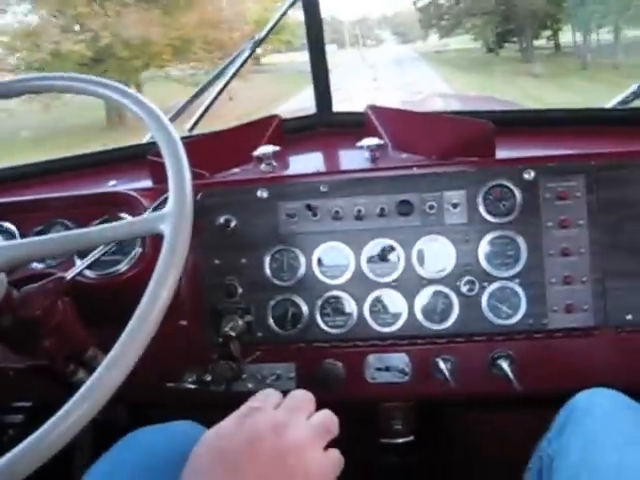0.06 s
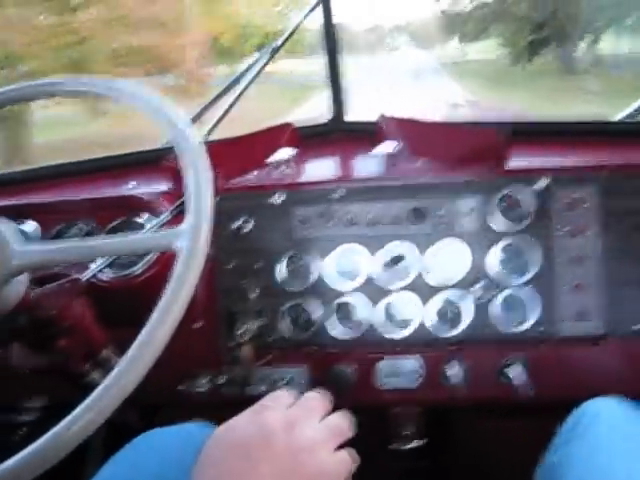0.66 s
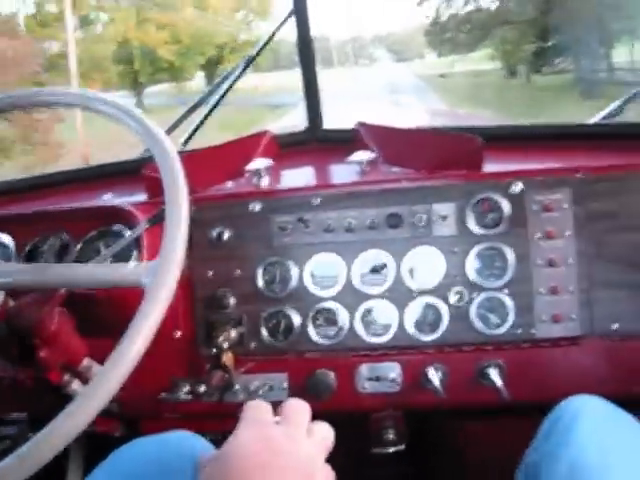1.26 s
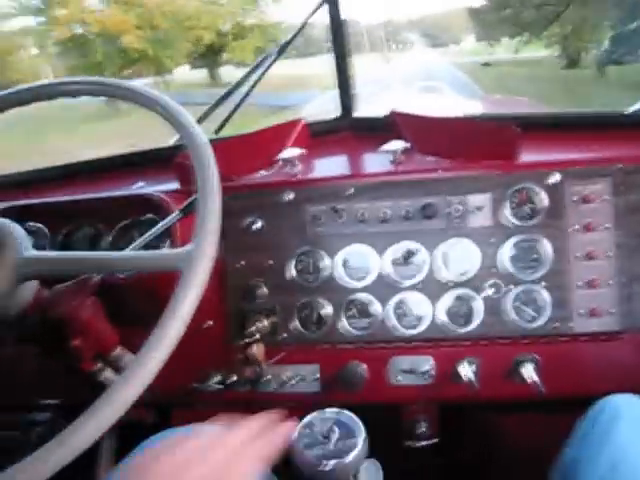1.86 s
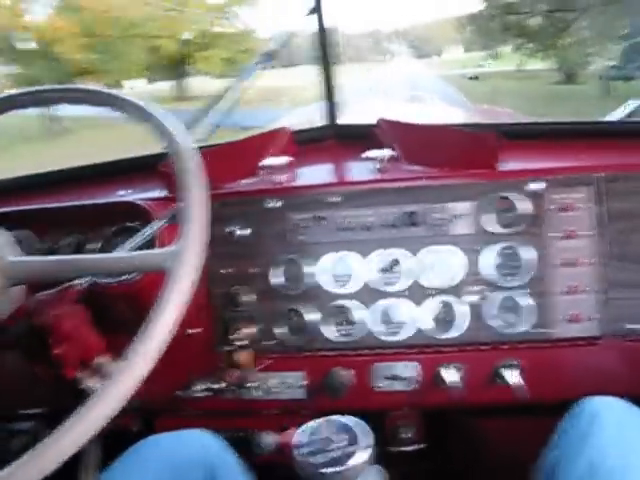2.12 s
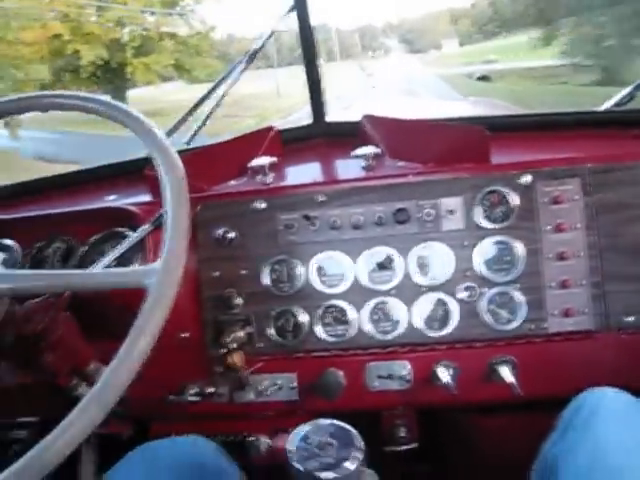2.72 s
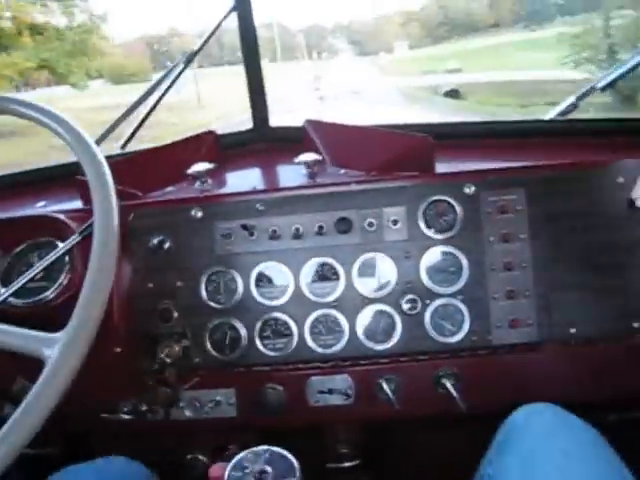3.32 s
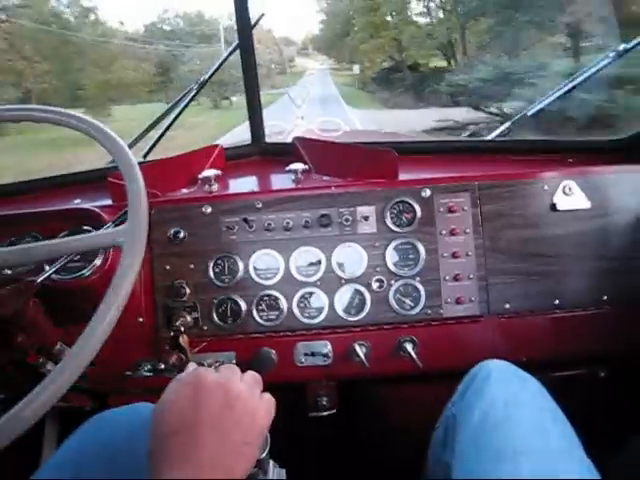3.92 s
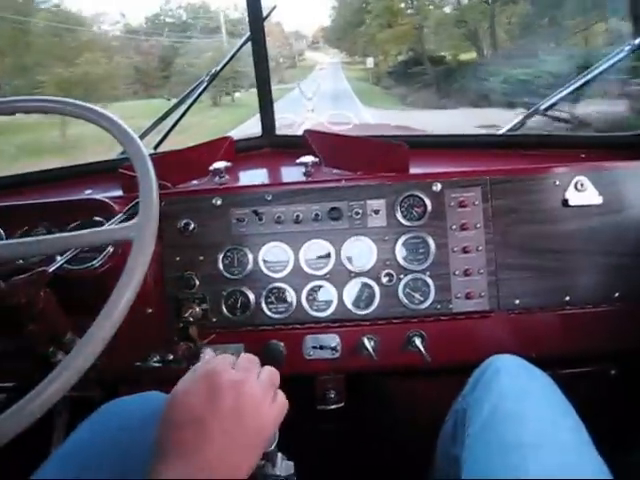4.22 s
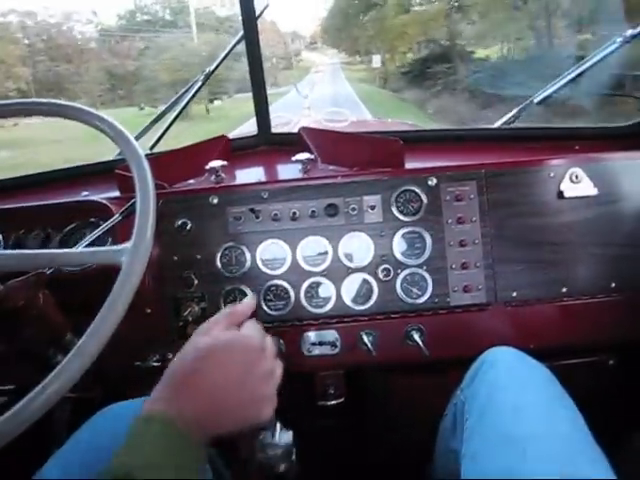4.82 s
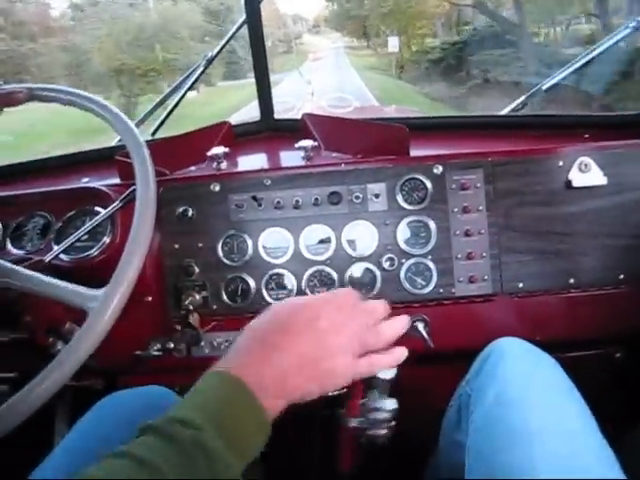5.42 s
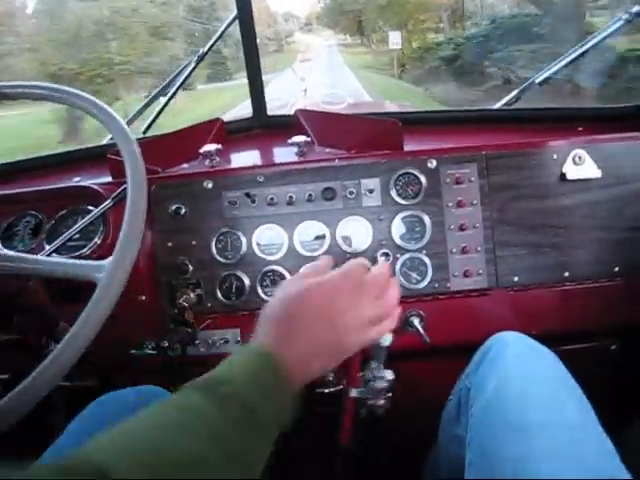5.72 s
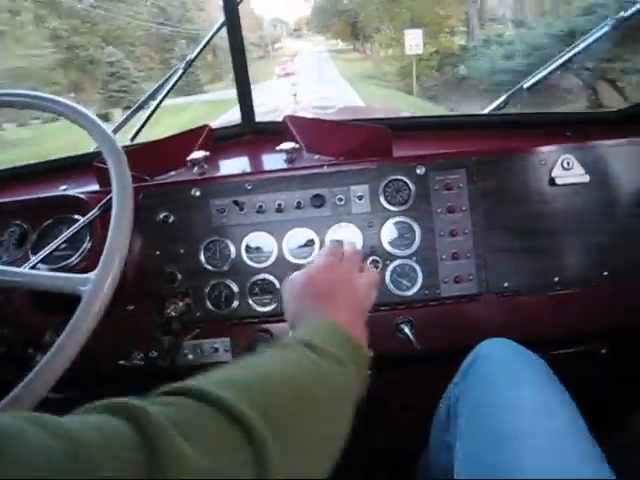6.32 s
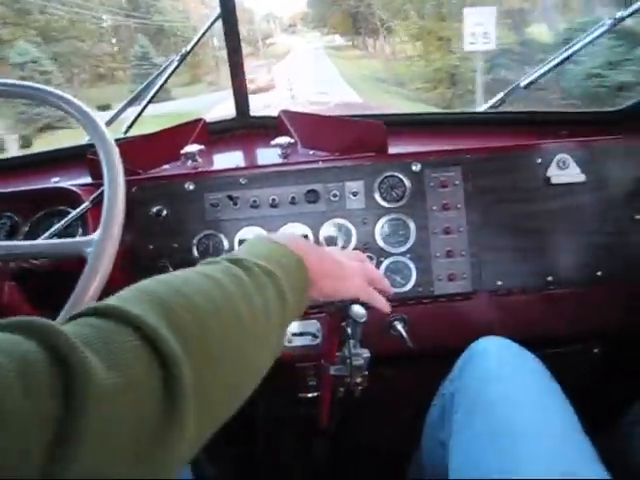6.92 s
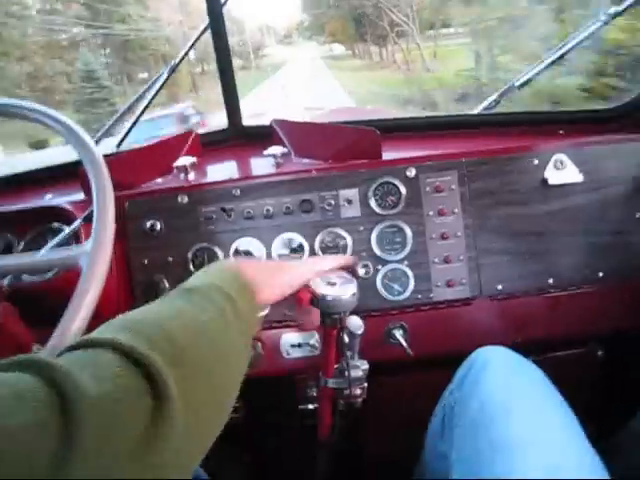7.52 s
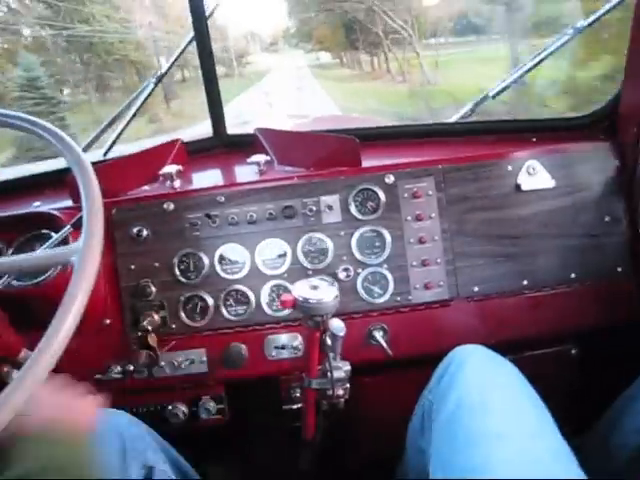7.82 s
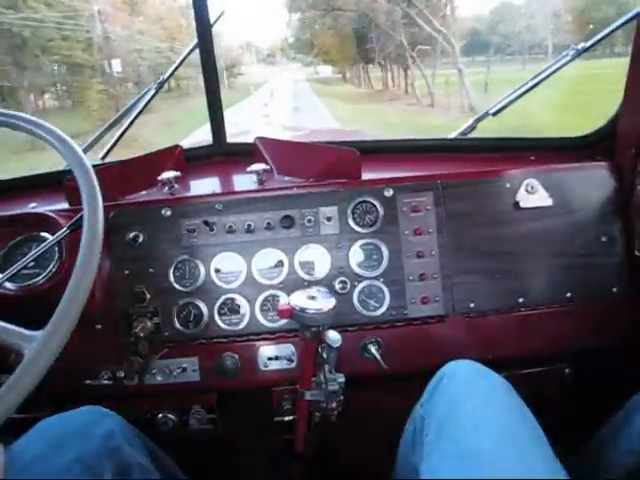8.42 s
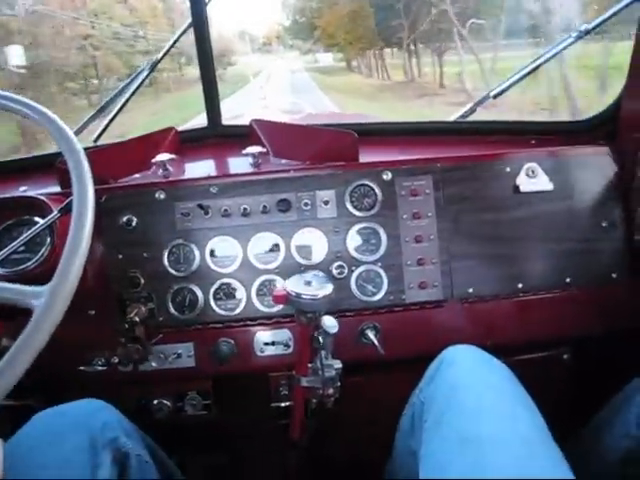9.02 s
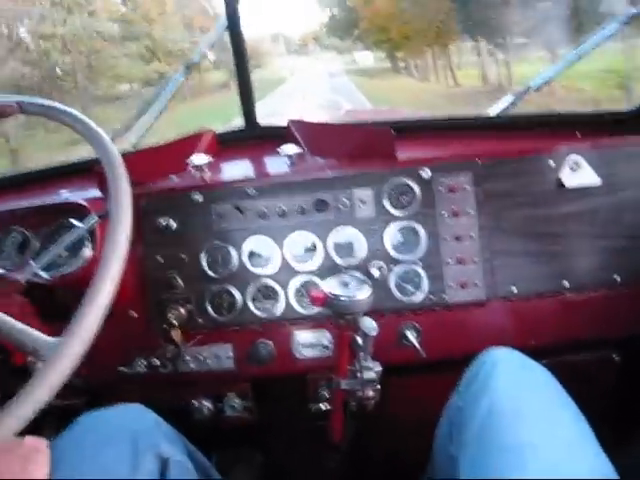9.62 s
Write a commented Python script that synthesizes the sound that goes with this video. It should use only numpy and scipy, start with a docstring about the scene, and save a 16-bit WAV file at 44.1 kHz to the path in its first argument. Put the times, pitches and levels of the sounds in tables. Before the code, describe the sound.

Inside the cab of a moving heavy truck, a diesel engine booms and clatters as its revs climb, then eases off. A click cuts to a faster pull. The revs sink for a slow gear change, with faint lever rattles and a few throttle blips, before the engine pulls again. Road rumble and a light gear whine run underneath, through a small, slightly overloaded microphone.

```python
"""In the cab of a heavy truck with a two-stroke V8 diesel. It pulls and eases off at 2.2 s; at 3.7 s an
edit splice clicks and cuts straight to a faster pull. The revs drop from 5 s for a slow gear change, the
engine is blipped, and it pulls again from 7.9 s. Throughout, the road rumbles, combustion clatters and
exhaust orders boom in the cab; gears whine and the lever rattles now and then. A small narrow-band
microphone is slightly overloaded."""
import sys
import numpy as np
from scipy import signal
from scipy.fft import rfft, irfft, next_fast_len
from scipy.io import wavfile
from scipy.ndimage import uniform_filter1d

SR = 44100
rng = np.random.default_rng(int(sys.argv[2]) if len(sys.argv) > 2 else 0)


def master(y):
    """Save y as 16-bit WAV."""
    cut = np.clip(np.atleast_2d(y).T, -1, 1)
    pcm = np.round(cut * 32767)  # scale
    wavfile.write(sys.argv[1], SR, pcm.astype(np.int16))


N = 426006
TIME = np.arange(N) / SR


def undb(db):
    """dB to gain."""
    return 10 ** (np.asarray(db) / 20)


def unit(x):
    """Scale to rms 1."""
    return x / np.sqrt(np.mean(x ** 2))


def noise():
    """White noise, rms 1."""
    return rng.standard_normal(N)


def walk(rate_hz):
    """Smooth random drift, rms 1."""
    steps = rng.standard_normal(4096)
    drift = np.interp(TIME * rate_hz, np.arange(len(steps)), steps)
    return unit(uniform_filter1d(drift, int(SR / rate_hz / 2) + 1))


def colour(x, points):
    """Shape x by (f/Hz, level/dB) points, steep skirts outside; rms 1."""
    hz, db = np.transpose(points)
    size = next_fast_len(N)
    f = np.maximum(np.arange(size // 2 + 1) * SR / size, 1)
    skirts = np.minimum(f / hz[0], 1) ** 6 * np.minimum(hz[-1] / f, 1) ** 6
    gain = skirts * undb(np.interp(np.log(f), np.log(hz), db))
    return unit(irfft(rfft(x, size) * gain, size)[:N])


def cab(load, rise_db_per_s=0.45):
    """The road shakes the cab, more as time goes on and on bumps; the panels drum more under load."""
    # road and panel spectra: f/Hz, level/dB
    road_spectrum = [(15, -4), (30, -2), (45, 0.5), (70, -8.5), (110, -5.5), (200, -15), (400, -31)]
    panel_spectrum = [(55, -15), (120, -1.5), (240, -1), (300, -4.5), (400, -2.5), (480, -7), (650, -13.5)]
    # road bumps: t/s, half-width/s, boost/dB
    bumps = [(5.313, .07, 6), (7.05, .07, 4)]
    bumps_db = sum(db * np.exp(-((TIME - at_s) / width_s) ** 2) for at_s, width_s, db in bumps)
    road_db = -33.5 + rise_db_per_s * TIME - 4.5 * load + bumps_db
    rumble = undb(road_db + 2.2 * walk(6.8)) * colour(noise(), road_spectrum)
    panels = undb(-35.5 + 6.5 * load + 2 * walk(15)) * colour(noise(), panel_spectrum)
    return rumble + panels


def lever(grain_db=3):
    """Short grainy scrapes and rattles of the gear linkage."""
    # scrapes: t/s, half-width/s, f/Hz, level/dB
    scrapes = [(2.598, 0.076, 2950, -39.5), (3.144, .025, 4800, -48), (5.771, 0.091, 3330, -41),
               (6.312, 0.04, 4270, -41.5), (6.522, 0.076, 900, -36), (6.525, 0.067, 3000, -42),
               (6.935, 0.033, 3000, -39.5), (7.017, 0.053, 3400, -40.5), (8.796, 0.58, 3780, -41)]
    out = np.zeros(N)
    grains = noise() * undb(grain_db * walk(250))
    for at_s, width_s, hz, db in scrapes:
        near = abs(TIME - at_s) < 2 * width_s
        band = signal.butter(2, [hz * 0.6, hz * 1.19], "band", fs=SR, output="sos")
        envelope = np.exp(-2 * ((TIME[near] - at_s) / width_s) ** 2)
        out[near] += undb(db) * envelope * unit(signal.sosfilt(band, grains[near]))
    return out


def whines(turns, crank_hz, growl_db, waver_db=2, fade_s=.15):
    """Meshing gears and blower lobes sing at high crank orders, swelling near a casing resonance."""
    # whines: start/s, end/s, order, level/dB, casing f/Hz, relative bandwidth, flutter/cycles
    meshes = [(2.5, 3.6, 32.2, -42, 1015, 0.11, 0.15), (6, 6.15, 36.6, -37, 860, 0.2, .07),
              (-3, 10, 78, -51.5, 2300, .36, .23)]
    slack_db = -.5 * np.maximum(growl_db + 37, 0)  # gears sing most when unloaded
    out = 0
    for start_s, end_s, order, db, casing_hz, width, flutter in meshes:
        meshed = np.clip(np.minimum(TIME - start_s, end_s - TIME) / fade_s, 0, 1)
        casing = 1 / np.hypot(1, 2 * np.log(order * crank_hz / casing_hz) / width)
        tone = np.sin(2 * np.pi * (order * turns + flutter * walk(70)))
        out = out + undb(db + slack_db + waver_db * walk(22)) * meshed * casing * tone
    return np.sqrt(2) * out


def firing_gate(turns, decay_firings):
    """Eight decaying bursts a turn, one per cylinder."""
    # knock of each cylinder in firing order: level/dB
    cylinder_db = [0.5, -0.3, 5.5, -4, 1, 2.5, -0.3, -5]
    firing, age = np.divmod(len(cylinder_db) * turns, 1)
    strength = undb(cylinder_db)[firing.astype(int) % len(cylinder_db)]
    return unit(strength * np.exp(-age / decay_firings))


def knocks(turns, uneven_db=1, size=8192):
    """One turn of combustion knocks, repeated with the crank: a comb of orders."""
    angle = np.arange(size) / size
    one_turn = firing_gate(angle, decay_firings=0.64) * rng.standard_normal(size)
    orders = rfft(one_turn)[1:190]
    orders = orders / abs(orders) * undb(uneven_db * rng.standard_normal(len(orders)))
    return unit(np.interp(turns % 1, angle, irfft(np.append(0, orders), size)))


def reflections(x, wet=.6, decay_s=.035, size=6000):
    """Hard cab walls smear each knock; partials swell and fade as they glide through dense resonances."""
    tail = rng.standard_normal(size) * np.exp(-np.arange(size) / SR / decay_s)
    return unit(x + wet * signal.fftconvolve(x, tail / np.linalg.norm(tail))[:N])


def combustion_db(crank_hz, pedal, coast_db, db_per_hz, throttle_db, falloff_db):
    """Combustion level grows with revs and fuel, most where the engine pulls hardest."""
    cruise_hz, hardest_pull_hz = 33, 35.88
    off_peak = (crank_hz - hardest_pull_hz) / 3
    fuel_db = (throttle_db - falloff_db * off_peak ** 2) * pedal ** 1.8
    return coast_db + db_per_hz * (crank_hz - cruise_hz) + fuel_db


def combustion(turns, load, growl_db, clatter_db, split_hz=1650, jitter_turns=0.0021):
    """Under load the block's growl repeats each turn; the treble is mostly fresh hiss from each firing."""
    # combustion spectra, pulling and coasting: f/Hz, level/dB
    pull_spectrum = [(540, -5.5), (640, -8), (720, -4), (980, -3), (1170, -8.5), (1450, -9.5),
                     (1700, -13.5), (2060, -15.5), (3400, -18.5), (4700, -22.5), (5400, -30.5)]
    coast_spectrum = [(420, -8.5), (640, -6), (800, -0.5), (1050, -5), (1350, -6), (1800, -8.5),
                      (2600, -8.5), (3600, -13), (5400, -21.5)]
    depth = 0.18 + 0.43 * load
    pulsing = 1 - depth + depth * firing_gate(turns, decay_firings=0.49)
    gate = unit(pulsing * undb(walk(260)))
    comb = reflections(knocks(turns + jitter_turns * walk(130)))  # uneven ignition
    growl = ("low", growl_db, .12 + .76 * load)
    clatter = ("high", clatter_db, .04 + .26 * load)
    out = 0
    for side, db, comb_share in (growl, clatter):
        source = np.sqrt(comb_share) * comb + np.sqrt(1 - comb_share) * gate * noise()
        split = signal.butter(3, split_hz, side, fs=SR, output="sos")
        pull = unit(signal.sosfilt(split, colour(source, pull_spectrum)))
        coast = unit(signal.sosfilt(split, colour(source, coast_spectrum)))
        out = out + undb(db + 0.5 * walk(22)) * (load * pull + (1 - load) * coast)
    return out


def exhaust(turns, crank_hz, pedal, load, waver_db=0.09, rough_db=0.22, wander_cycles=.05):
    """Each bank fires four times a turn, unequal cylinders add other orders; three boom in the cab."""
    boom_orders, throttle_boosts_db = (4, 5, 7), (10.5, 0.5, 1)
    # cab resonances, one curve per booming order: f/Hz, level/dB
    cab_responses = [
        [(112, -32.5), (128, -26.5), (140, -22.5), (158, -23)],
        [(140, -34.5), (146, -28), (160, -23.5), (165, -33.5), (177, -33.5), (191, -24), (198, -21)],
        [(196, -25), (228, -20.5), (250, -26), (265, -31.5), (276, -45)],
    ]
    # weaker orders: multiples of the crank speed
    weak_orders = [1, 2, 3, 6, 8, 9, 10, 11, 12, 13, 14, 15, 16]
    # one row per weak order: level/dB at each coast_hz, level/dB at each pull_hz
    weak_db = [(-38.5, -34.5, -34, -40, -46, -50), (-44, -41, -40, -44, -52, -48),
               (-45, -42.5, -46, -34.5, -40.5, -31), (-39, -35, -30.5, -32.5, -32.5, -27),
               (-30.5, -36.5, -42, -33.5, -30, -27), (-30, -38.5, -48.5, -36, -31, -26),
               (-47.5, -42.5, -40, -42.5, -31, -32), (-44, -53, -35.5, -27, -34.5, -30.5),
               (-42.5, -48.5, -37.5, -24, -18, -29), (-49.5, -40, -44, -24.5, -26.5, -32.5),
               (-47, -56.5, -53, -39, -51.5, -40.5), (-44, -54.5, -57.5, -35.5, -33.5, -33),
               (-52, -64, -54, -41.5, -22.5, -37.5)]
    coast_hz, pull_hz = (28.5, 32, 36.5), (33, 35, 37.5)
    out = 0
    for order, response, boost_db in zip(boom_orders, cab_responses, throttle_boosts_db):
        db = np.interp(order * crank_hz, *np.transpose(response)) + boost_db * pedal
        out = out + undb(db + waver_db * walk(25)) * np.sin(2 * np.pi * (order * turns + rng.random()))
    for order, row in zip(weak_orders, weak_db):
        coast_db = np.interp(crank_hz, coast_hz, row[:3])
        pull_db = np.interp(crank_hz, pull_hz, row[3:])
        db = coast_db + (pull_db - coast_db) * load + rough_db * walk(18)
        lag = rng.random() + wander_cycles * walk(6)  # cylinder balance keeps shifting
        out = out + undb(db) * np.sin(2 * np.pi * (order * turns + lag))
    return np.sqrt(2) * out


def crank_speed_hz():
    """Even climbs, slower in each higher gear, with falls and blips between; a step at the splice."""
    # pulls: start/s, end/s, starting crank speed/Hz, climb/(Hz/s)
    pulls = [(.13, 2.08, 32.2, 2.75), (3.746, 4.8, 37.3, 2.1), (7.88, 9.06, 32.1, 1.2)]
    # revs while easing off and through the gear change: t/s, crank speed/Hz
    ease_revs = [(2.16, 37.3), (2.256, 36.3), (2.57, 34.2), (2.776, 30.7), (3.006, 32.2), (3.232, 32.0),
                 (3.398, 31.3), (3.548, 31.7), (3.744, 31.6)]
    shift_revs = [(4.96, 38.4), (5.29, 37.5), (6.12, 28.1), (6.47, 28.0), (6.53, 28.6), (6.98, 28.7),
                  (7.2, 33.4), (7.38, 30.3), (7.55, 33.0), (7.68, 31.6), (7.8, 32.3)]
    points = [*ease_revs, *shift_revs]
    for start_s, end_s, hz, hz_per_s in pulls:
        points += [(start_s, hz), (end_s, hz + hz_per_s * (end_s - start_s))]
    return np.interp(TIME, *np.transpose(sorted(points)))


def throttle():
    """Pedal depth 0-1: each press rises, holds and falls."""
    # accelerator presses: down/s, rise/s, lifted/s, fall/s, depth/0-1
    presses = [(-.5, .7, 2.17, .11, 0.99), (2.8, 1, 3.75, .05, 0.77), (3.74, 0.013, 4.88, 0.14, 1),
               (6.47, 0.044, 6.53, 0.067, .35), (6.601, 0.26, 7.05, .1, .15), (6.98, .2, 7.23, 0.17, .45),
               (7.33, .24, 9.08, 1.4, 1)]
    pedal = np.zeros(N)
    for down_s, rise_s, lifted_s, fall_s, depth in presses:
        ramps = np.minimum((TIME - down_s) / rise_s, 1 - (TIME - lifted_s) / fall_s)
        pedal = np.maximum(pedal, depth * np.clip(ramps, 0, 1))
    return pedal


def scene():
    """Crank speed and pedal drive every engine layer; the level dips briefly at the first bump."""
    crank_hz, pedal = crank_speed_hz(), throttle()
    turns = 1 + np.cumsum(crank_hz) / SR + 0.0015 * walk(20)  # the crank runs slightly unevenly
    load = np.clip(pedal / 0.79, 0, 1)  # full pulling tone from this depth on
    growl_db = combustion_db(crank_hz, pedal,
                             coast_db=-35.5, db_per_hz=0.07, throttle_db=8.5, falloff_db=1.5)
    clatter_db = combustion_db(crank_hz, pedal,
                               coast_db=-42.58, db_per_hz=0.47, throttle_db=7.5, falloff_db=0.75)
    engine = exhaust(turns, crank_hz, pedal, load) + combustion(turns, load, growl_db, clatter_db)
    sound = engine + whines(turns, crank_hz, growl_db) + cab(load) + lever()
    dip_at_s, dip_width_s = 5.293, 0.0095
    dip = 1 - 0.86 * np.exp(-((TIME - dip_at_s) / dip_width_s) ** 2)
    return (dip * sound)[None]


def record(dry, ceiling=0.37, drive_db=1.5, low_cut_hz=28, mic_top_hz=5370, top_hz=16000, splice_s=3.746):
    """The microphone flattens peaks and passes a narrow band; an edit splice adds a wideband click."""
    x = dry * undb(drive_db) / ceiling
    x = ceiling * x / (1 + x ** 4) ** (1 / 4)
    x = signal.sosfilt(signal.butter(1, low_cut_hz, "high", fs=SR, output="sos"), x)
    x = signal.sosfilt(signal.ellip(10, .2, 90, mic_top_hz, fs=SR, output="sos"), x)
    splice_click = .095 * noise() * np.exp(-abs(TIME - splice_s) / .0006)
    return signal.sosfilt(signal.ellip(8, .2, 70, top_hz, fs=SR, output="sos"), x + splice_click)


dry = scene()
out = record(dry)
master(out)
```